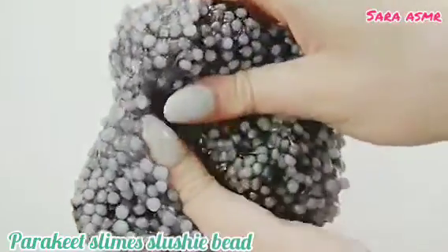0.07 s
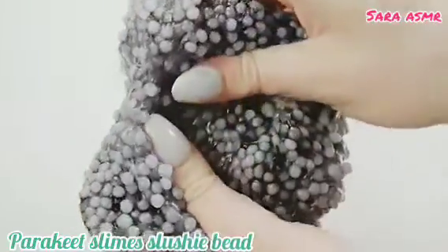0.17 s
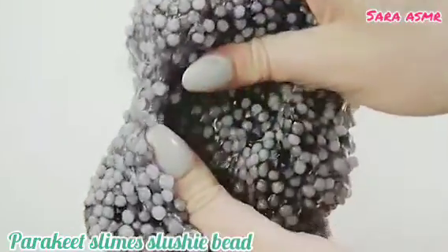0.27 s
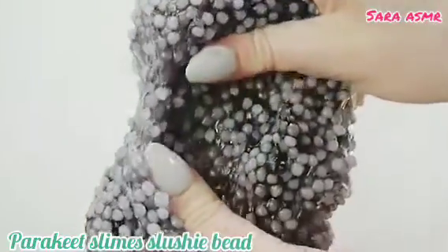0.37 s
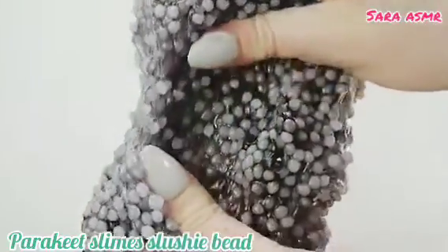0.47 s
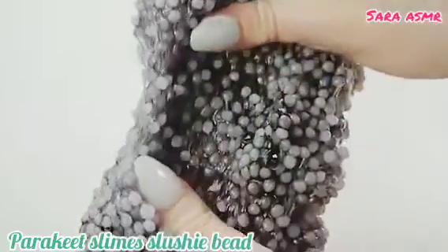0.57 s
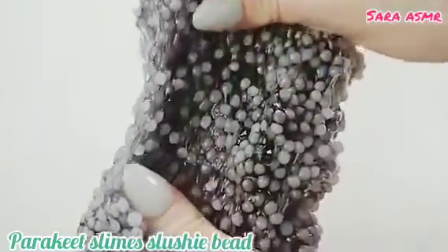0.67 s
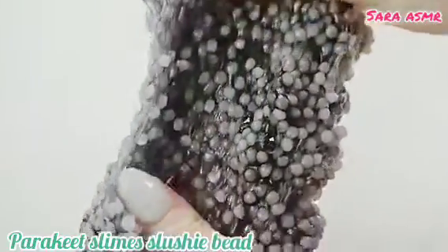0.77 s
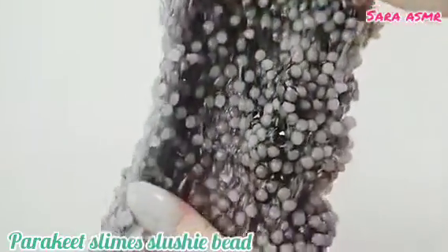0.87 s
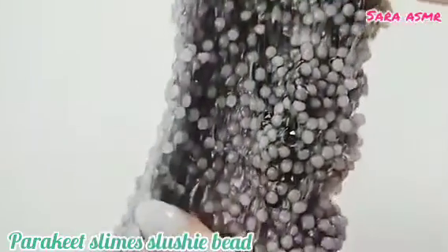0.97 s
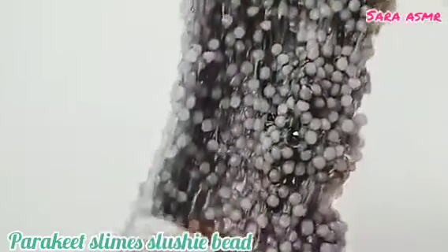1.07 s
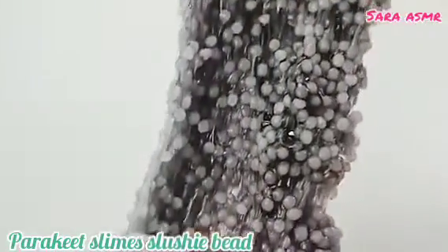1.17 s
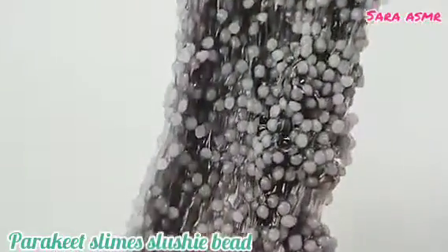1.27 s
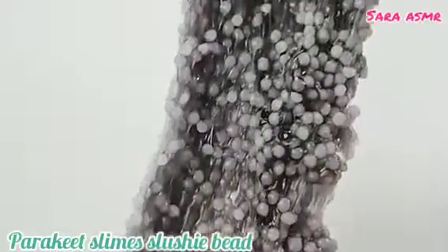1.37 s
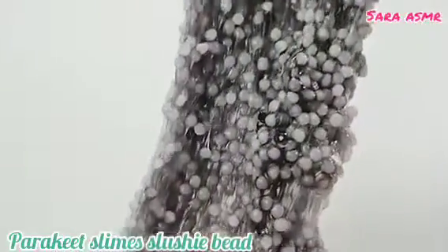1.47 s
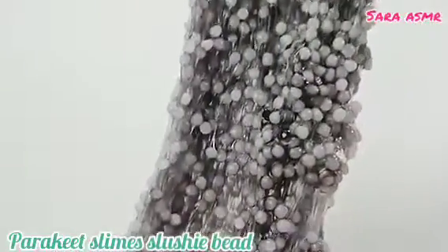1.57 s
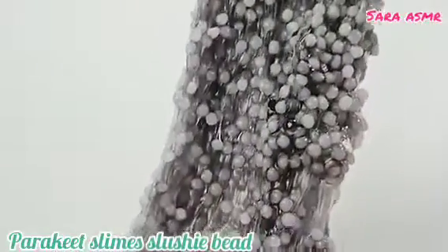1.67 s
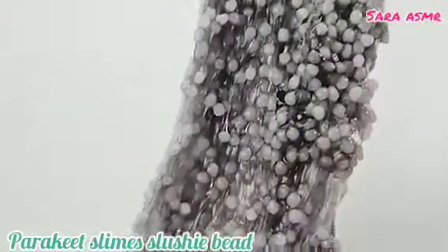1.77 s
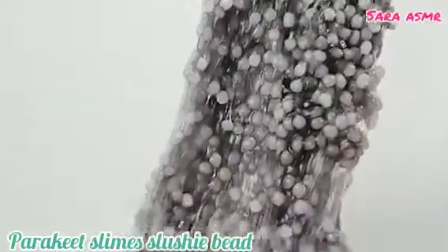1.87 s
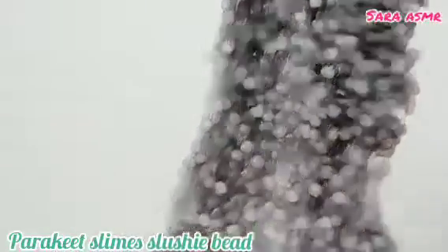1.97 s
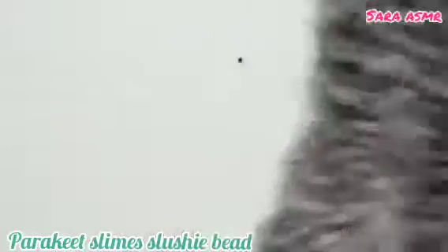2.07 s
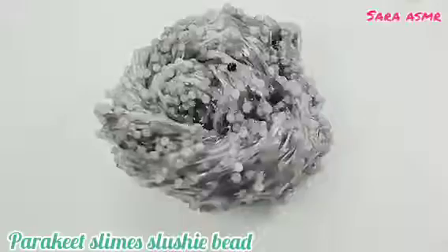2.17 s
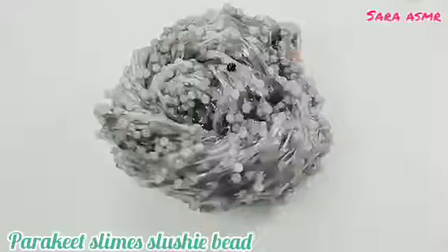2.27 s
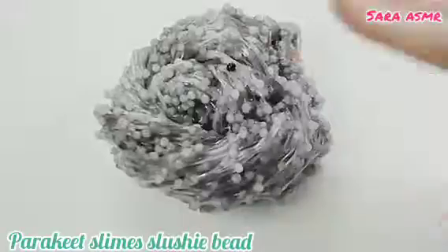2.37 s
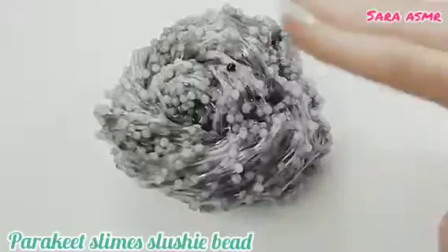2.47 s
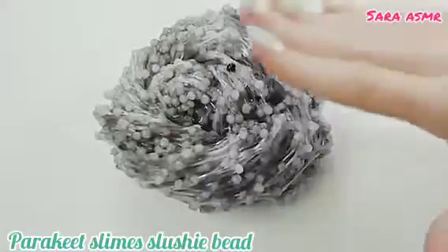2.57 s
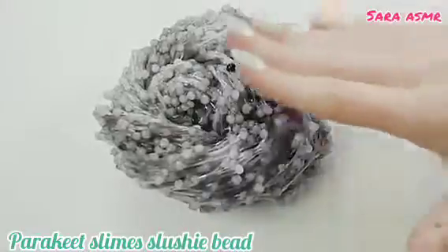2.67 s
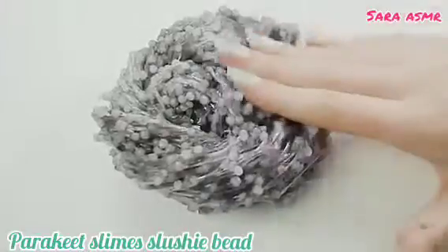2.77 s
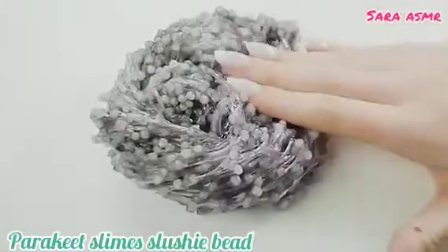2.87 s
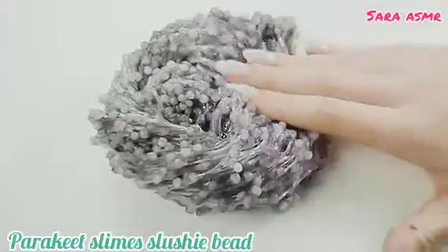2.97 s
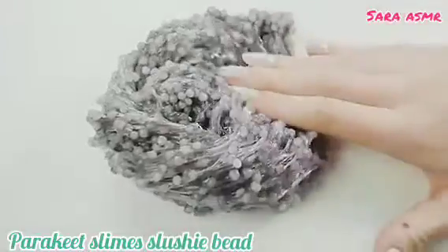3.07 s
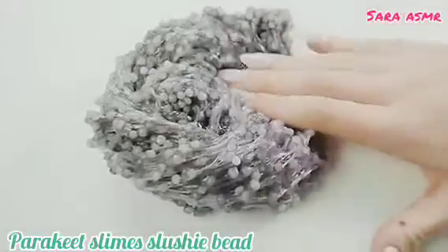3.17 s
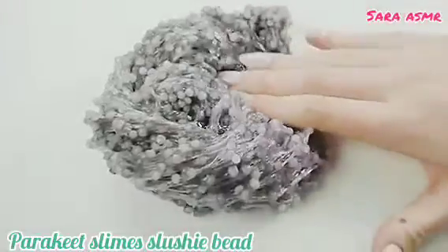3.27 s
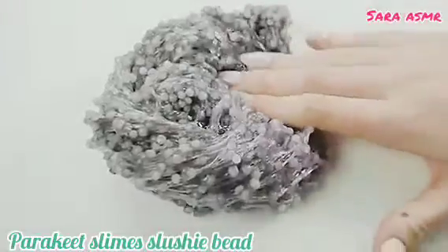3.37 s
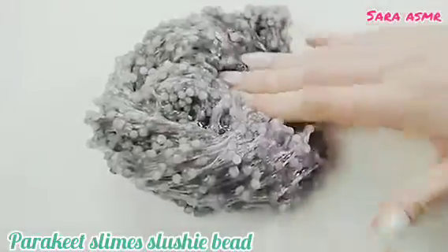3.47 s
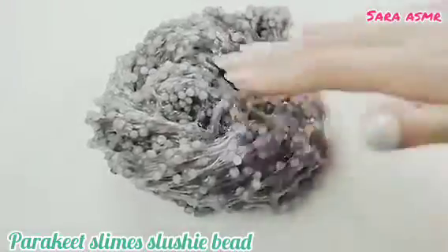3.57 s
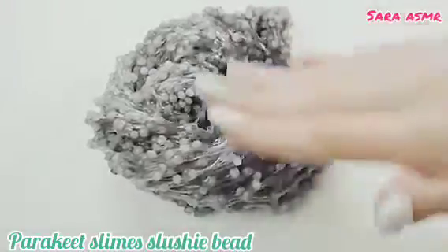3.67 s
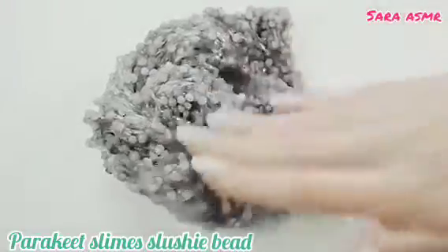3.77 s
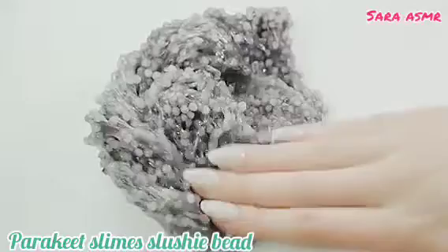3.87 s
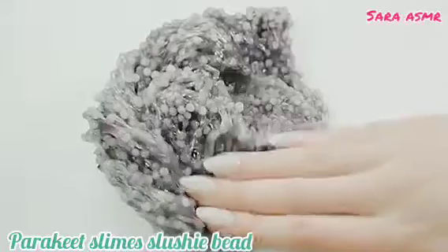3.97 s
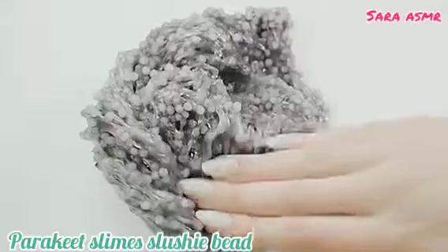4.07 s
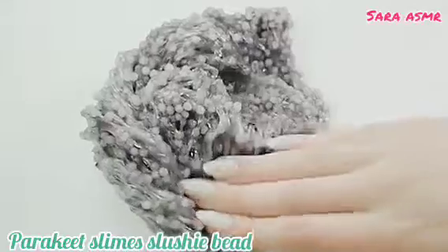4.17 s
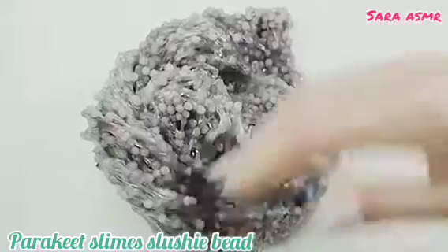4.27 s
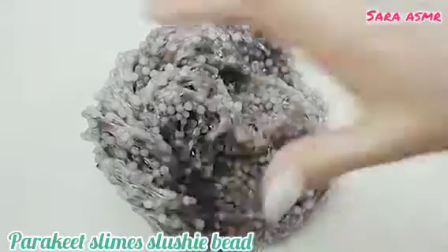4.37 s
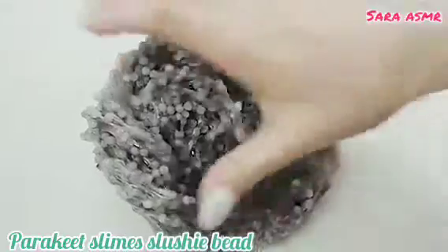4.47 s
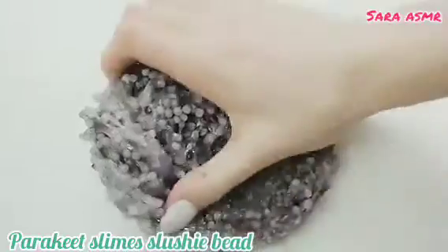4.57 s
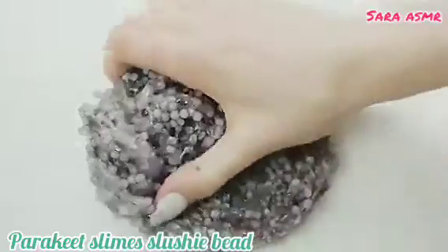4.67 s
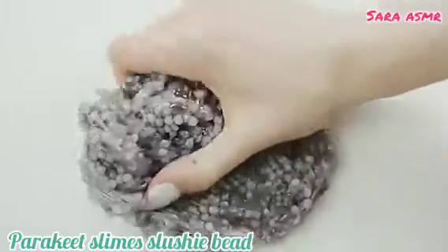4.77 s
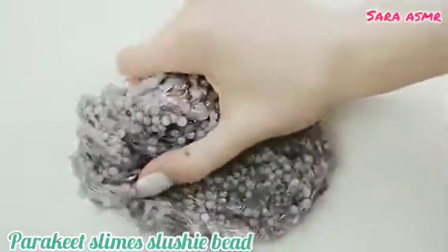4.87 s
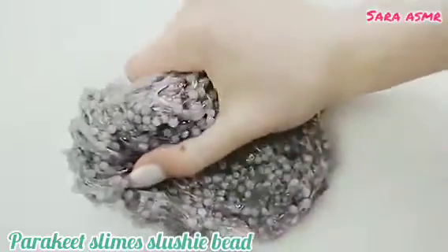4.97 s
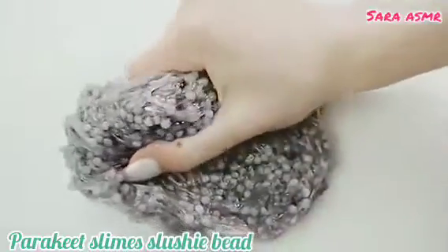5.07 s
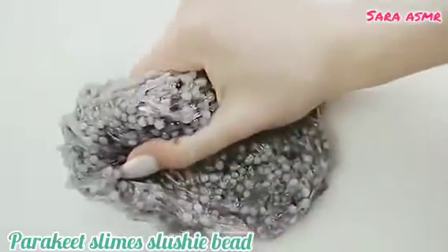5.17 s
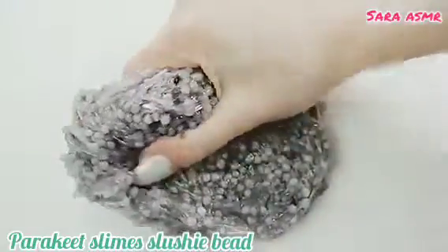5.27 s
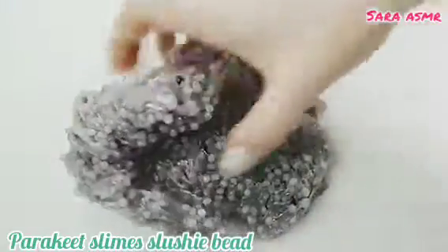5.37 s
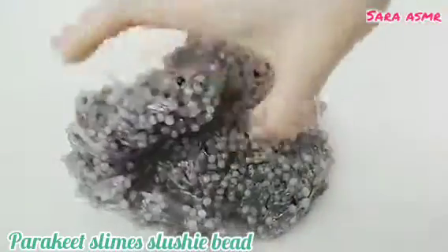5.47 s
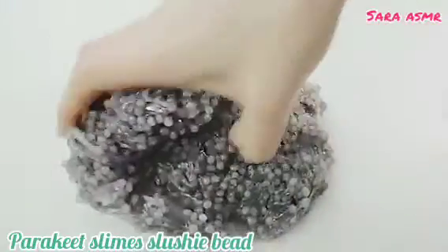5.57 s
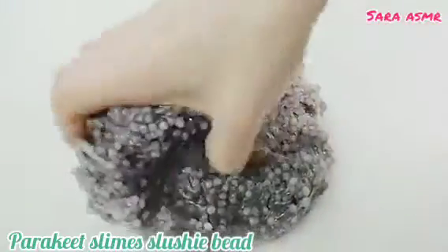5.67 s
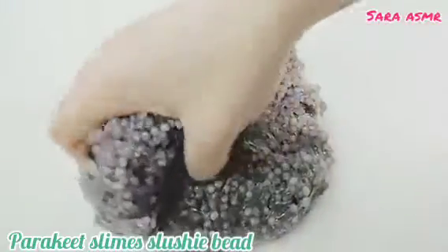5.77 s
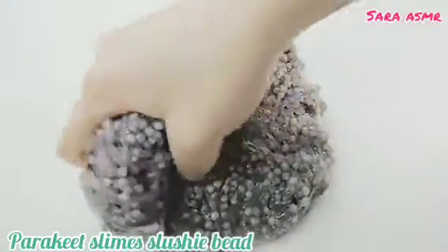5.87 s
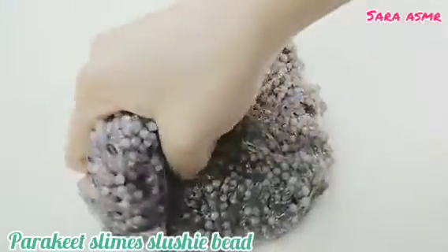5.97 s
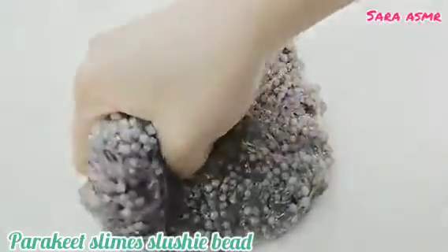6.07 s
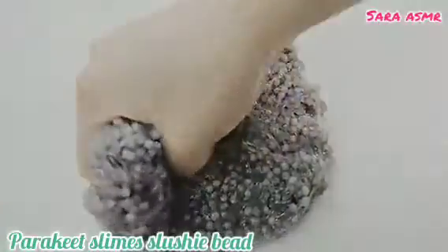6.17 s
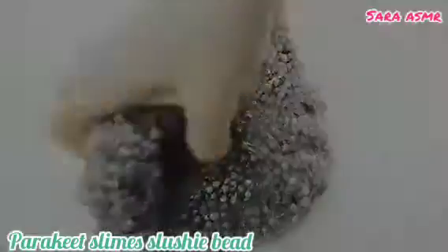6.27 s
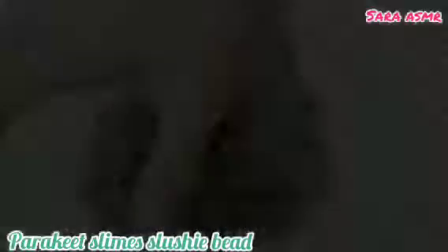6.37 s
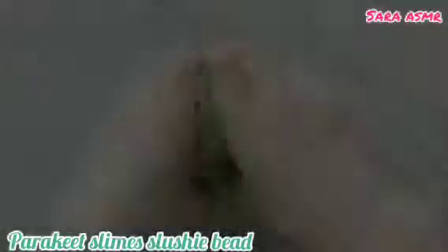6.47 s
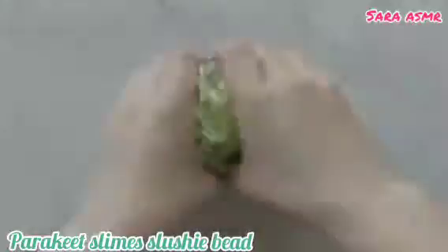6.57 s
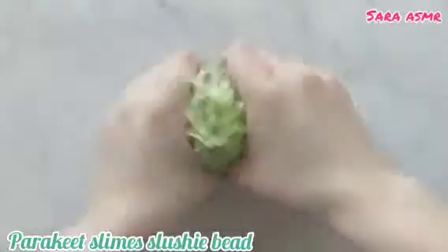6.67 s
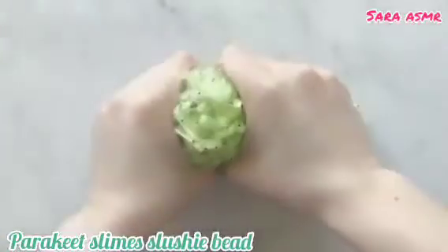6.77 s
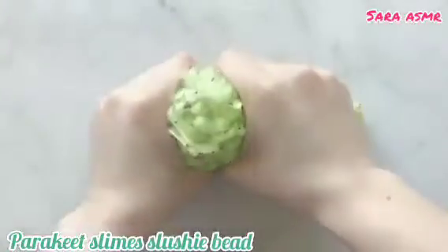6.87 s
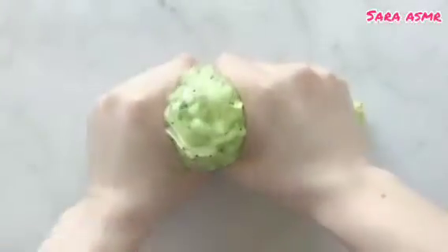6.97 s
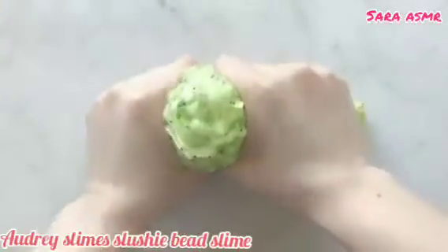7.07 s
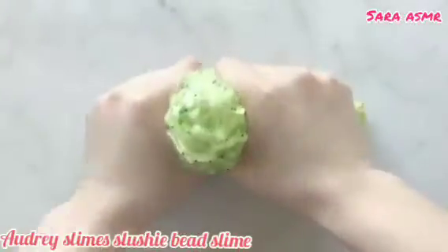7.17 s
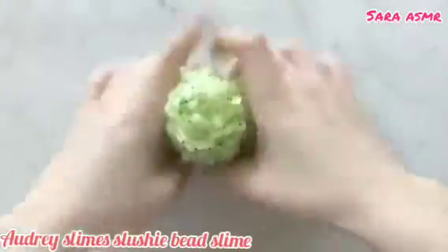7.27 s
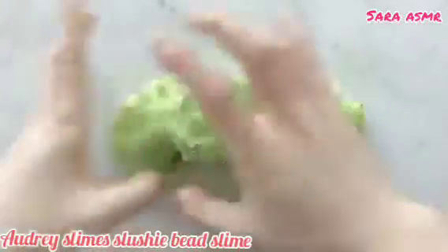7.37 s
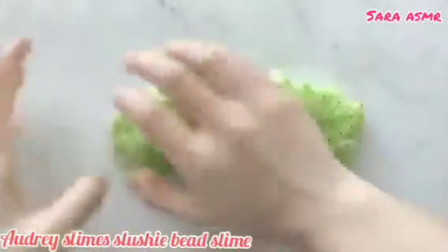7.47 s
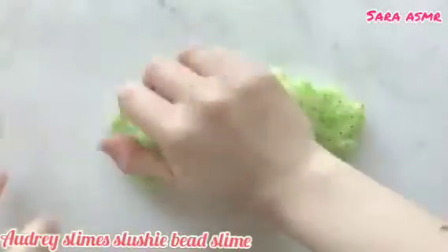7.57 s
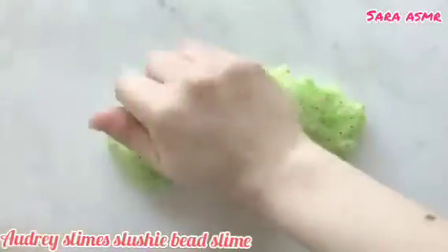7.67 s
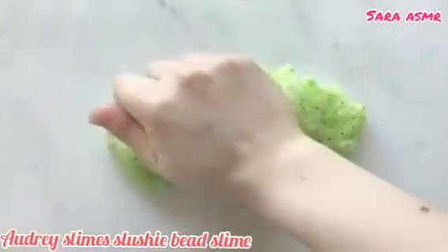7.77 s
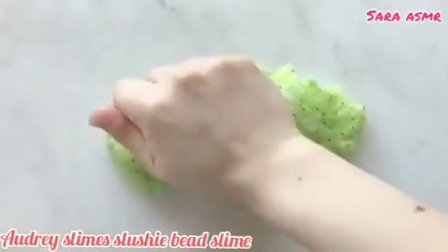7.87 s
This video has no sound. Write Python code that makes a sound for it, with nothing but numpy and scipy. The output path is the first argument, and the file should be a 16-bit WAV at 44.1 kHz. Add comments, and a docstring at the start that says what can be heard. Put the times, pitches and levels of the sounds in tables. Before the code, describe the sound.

Bead-filled slime is worked by hand on a table in a small room, heard very close. First comes one long pull with fine crackles and ticks, then repeated presses that crackle, pop and die away, and finally two loud, crisp squeezes ending in a cluster of pops. Skin brushes softly between grips. There is a faint low rumble throughout and a quiet machine hum during the last squeezes.

```python
"""Slime full of small beads, worked by hand on a table, close up. Trapped air bursts between the beads
in a dense crackle; loud pops leave a short wake of more. A few bubbles ring, with a click and a low knock.
Three passages: one batch is stretched, then pressed and folded, then a second is squeezed in both fists.
Each grip builds, holds and lets go; between grips the hand slides off with a soft swish.
Room and arms rumble underneath; a machine hums in the last passage."""
import sys
import numpy as np
from scipy import signal
from scipy.io import wavfile
from scipy.ndimage import uniform_filter1d

SR = 44100
rng = np.random.default_rng(int(sys.argv[2]) if len(sys.argv) > 2 else 0)


def transcribe(u):
    """Save the signal u as a 16-bit wav file named by the first command-line argument.

    u: samples, shape (n,) or (channels, n), limited to [-1, 1]; the rate is SR.
    q: integer samples, one column per channel.
    """
    v = np.clip(np.atleast_2d(u).T, -1, 1)
    q = np.round(v * 32767).astype(np.int16)
    wavfile.write(sys.argv[1], SR, q)


N = 349272
T = np.arange(N) / SR
BINS_HZ = np.fft.rfftfreq(1024, 1 / SR)


def amp(db):
    """dB to gain."""
    return 10 ** (np.asarray(db) / 20)


def unit_rms(x):
    """Scale to rms 1."""
    return x / np.sqrt(np.mean(x ** 2) + 1e-20)


def unit_energy(x):
    """Scale to energy 1."""
    return x / (np.linalg.norm(x) + 1e-12)


def gain_curve(rows):
    """Gain from rows (t/s, level/dB); silent before the first."""
    times_s, db = np.transpose(rows)
    return amp(np.interp(T, times_s, db, left=-200))


def strokes(rows, taper):
    """Gain of movements (start/s, end/s, level/dB), one arch of speed each."""
    gain = np.zeros(N)
    for start_s, end_s, db in rows:
        progress = np.clip((T - start_s) / (end_s - start_s), 0, 1)
        gain += amp(db) * abs(np.sin(np.pi * progress)) ** taper
    return gain


def spectrum_db(colour):
    """Rows (f/Hz, level/dB) interpolated onto BINS_HZ in log frequency."""
    hz, db = np.transpose(colour)
    return np.interp(np.log(BINS_HZ + 1), np.log(hz + 1), db)


def add(mix, at_s, sound):
    """Mix in place."""
    part = mix[max(round(at_s * SR), 0):][:len(sound)]
    part += sound[:len(part)]


def click(db):
    """Minimum-phase impulse with this spectrum on BINS_HZ."""
    log_gain = np.log(amp(np.maximum(db, db.max() - 80)))
    mirrored = np.concatenate([log_gain, log_gain[-2:0:-1]])
    return np.fft.ifft(np.exp(signal.hilbert(mirrored).conj())).real


def tinted(x, colour):
    """Filter by rows (f/Hz, level/dB)."""
    return signal.oaconvolve(x, click(spectrum_db(colour)))[:N]


def drift(per_s, size=N):
    """Random curve, rms 1, with per_s knots a second."""
    knots = rng.standard_normal(N // 16)
    return unit_rms(np.interp(T[:size] * per_s, np.arange(len(knots)), knots))


# Starts of pressing and squeezing: t/s
PASSAGE_STARTS_S = [2.4, 6.42]
PASSAGE = np.searchsorted(PASSAGE_STARTS_S, T)
STRETCHING, PRESSING, SQUEEZING = (PASSAGE == k for k in range(3))


def pocket_db(hz, width_oct):
    """Broad resonance of a bursting air pocket, weak in the bass."""
    detune = np.log2((BINS_HZ + 1) / hz) / max(width_oct, .2)
    tilt_db = -10 * np.log10(BINS_HZ / 400 + (400 / (BINS_HZ + 1)) ** 2)
    return tilt_db - 55 * np.log10(1 + detune ** 2 / 10)


def crackle(active, colour, pockets_per_s, spread_db, clump_db, width_oct, ticks_db, ticks_per_s=110):
    """Pockets burst in clumps: big, low ones singly, tiny, high ones as a fizz. Knocking beads tick."""
    centres_hz = np.geomspace(400, 13000, 14)
    bands = np.array([amp(pocket_db(hz, width_oct)) for hz in centres_hz])
    bands *= amp(spectrum_db(colour)) / np.sqrt((bands ** 2).sum(0))
    rates_per_s = pockets_per_s * centres_hz ** 0.99 / np.sum(centres_hz ** 0.99)
    size = int(active.sum())
    fizz = np.zeros(size)
    clumps_db = clump_db * drift(110, size)
    for band, per_s in zip(bands, rates_per_s):
        onsets = np.flatnonzero(rng.random(size) < per_s / SR)
        draws = rng.laplace(size=N // 8)[:len(onsets)]
        bursts = np.zeros(size)
        bursts[onsets] = np.sign(draws) * amp(spread_db * np.minimum(abs(draws), 3.5) + clumps_db[onsets])
        local_power = abs(uniform_filter1d(bursts ** 2, size=5000))
        bursts /= np.sqrt(local_power + 1e-6)  # even loudness over about 0.1 s
        bursts *= amp(3.2 * drift(45, size))  # pocket sizes prevail by turns
        fizz += signal.oaconvolve(bursts, click(20 * np.log10(band)))[:size]
    knocks = (rng.random(size) < ticks_per_s / SR) * rng.standard_normal(size)
    ticks = unit_rms(tinted(knocks, colour)[:size])
    out = np.zeros(N)
    out[active] = unit_rms(fizz) + amp(ticks_db) * ticks
    return out


# Crackle of the pull: t/s, relative level/dB
PULL_LEVEL = [(0, -39.5), (.16, -43), (.22, -50.5), (.43, -44), (.61, -49.5), (.8, -45.5), (1.02, -52),
              (1.1, -45.5), (1.53, -50.5), (1.7, -46), (1.96, -41), (2.05, -58.5), (2.19, -42)]
# Its spectrum: f/Hz, level/dB
PULL_SPECTRUM = [(150, -11.5), (300, -13), (500, -6.5), (800, -9), (1500, -6), (2600, -1), (4300, -6),
                 (7000, -3.5), (11000, -2.5), (15500, -21)]


def stretch(wake, wake_db=-38):
    """One long pull bursts pockets in a light crackle, rich in bead ticks."""
    effort = np.hypot(gain_curve(PULL_LEVEL), amp(wake_db) * wake)
    return amp(-4) * effort * crackle(STRETCHING, PULL_SPECTRUM, pockets_per_s=2800, spread_db=2.5,
                                      clump_db=3.5, width_oct=0.45, ticks_db=-0.5)


# Room rumble per passage: level/dB
ROOM_RUMBLE_DB = [-59, -61, -55]
# Arms moving over the table: start/s, end/s, level/dB
ARM_STROKES = [(-.5, .9, -55.5), (1.8, 2.06, -52), (2.4, 4.35, -62), (5.2, 5.85, -52.5)]
# Rumble spectrum: f/Hz, level/dB
RUMBLE_SPECTRUM = [(15, -40), (25, -25.5), (70, -18), (115, -11), (167, -14.5), (286, -8.5), (529, -19),
                   (588, -17), (709, -24), (927, -22), (1120, -24.5), (15000, -40)]


def rumble(push, push_db=-30, side_db=-7):
    """Uneven low noise of room, arms and the push on the table; mono in the last passage."""
    mid, side = (unit_rms(tinted(rng.standard_normal(N), RUMBLE_SPECTRUM)) for _ in range(2))
    stereo = mid + amp(side_db) * np.array([side, -side]) * ~SQUEEZING
    steady = amp(ROOM_RUMBLE_DB)[PASSAGE]
    arms = strokes(ARM_STROKES, taper=0.2)
    gain = np.sqrt(steady ** 2 + arms ** 2 + (amp(push_db) * push) ** 2)
    return stereo * gain * amp(2.3 * drift(14))


# Loudest pockets: t/s, relative energy/dB, f/Hz, width/oct, flurry share of energy/0-1
LOUD_POCKETS = [(0.035, -15, 3300, 0.32, .1), (0.0936, -5, 5400, 0.4, 0.56), (0.146, -6, 4400, 0.54, 0),
                (0.2434, -15, 5100, .6, .6), (0.3112, -0.5, 9700, 0.74, 0), (0.383, -5.5, 8800, .75, 0.84),
                (0.4305, 3, 9600, 0.71, 0.99), (0.5083, -11.5, 9700, .16, 0), (0.636, -17, 5600, 1.7, 0.8),
                (0.6845, -5, 9700, .16, 0.4), (0.7538, -9.5, 3400, 1.3, 0.33),
                (0.8795, -14.5, 2480, 0.5, 0), (0.9185, -17.5, 6000, 1.4, 0.16),
                (1.1242, -14, 7900, 0.7, 0.5), (1.1915, -5.5, 5540, 0.88, 0.76),
                (1.2599, -7, 6700, 0.93, 0.3), (1.338, -15, 4000, 0.73, .7), (1.402, -12, 4100, 0.56, 0),
                (1.413, -10.5, 9000, 0.86, 0.7), (1.5824, -7, 8700, 0.92, 0.9),
                (1.6275, -7.5, 8900, 0.6, 0.04), (1.6676, -2.5, 4800, 0.63, 0.4),
                (1.6753, -4.5, 7000, 0.63, 0.94), (1.964, -8.5, 4800, 1.2, 0.73),
                (2.7908, -6, 2400, 2.2, 0.46), (2.9373, -4, 2400, .56, 0), (2.9852, -5.5, 7200, 0.41, 0.7),
                (2.994, -5, 2200, 0.51, 0.4), (3.065, -8.5, 2600, 0.61, .45), (3.128, -8, 1800, 0.26, 0.5),
                (3.1675, -5, 4700, 0.89, 0), (3.2272, -12, 2220, 0.57, 0.4), (3.2769, -3, 2600, 1.17, 0.04),
                (3.3454, -11.5, 1625, 0.31, 0.14), (3.3799, -3.5, 6000, 0.9, 0),
                (3.8863, -1.5, 1500, 1.1, 0), (4.006, -4, 2400, 0.64, .4), (4.046, -4.5, 5100, 0.75, 0.7),
                (4.134, -9, 3000, 0.51, 0), (4.1854, -3.5, 2700, 0.72, 0.23), (4.6142, -5.5, 7500, 0.46, 1),
                (4.6682, 0, 3100, 0.51, 0.4), (4.7175, 3.5, 3700, .8, 0.2), (4.8787, 2.5, 2900, 1.15, 0.74),
                (4.942, 7.5, 4850, 1.2, 0.13), (4.957, 4, 5330, 0.35, 1), (4.9928, 5.5, 4000, 2.7, 0.88),
                (5.1766, 0.5, 3900, 0.92, .6), (5.2639, -14.5, 4960, 0.88, 0.3),
                (5.659, -3, 3400, 0.53, 0.24), (5.7158, 0, 2200, 0.41, 0.1), (5.7731, 4, 2500, 1.03, 0.54),
                (5.7882, -0.5, 8500, 0.68, 0.7), (5.8355, 1, 3500, 2.1, 0.25), (5.954, 2, 2900, 0.85, 0.6),
                (6.026, 8, 3700, 0.87, 0.5), (6.203, -9, 2320, 0.42, 0.4), (6.5395, -6, 2800, 0.75, 0.3),
                (6.6396, 2.5, 2300, 0.61, 0.4), (6.7548, 4.5, 4400, 1.5, .86),
                (6.7641, 10.5, 7000, 0.45, 0), (6.7984, 5, 7100, 0.28, 0.5), (6.8257, 4, 2800, 8.6, .1),
                (6.8592, 13, 6200, 0.56, .98), (6.894, 11, 8500, 0.7, 0.93), (6.95, 8, 6300, 0.88, 0.5),
                (7.052, 7.5, 11300, 0.32, 1), (7.077, -1, 4800, 0.36, .64), (7.109, -2.5, 7400, 0.93, .7),
                (7.5762, -9, 3600, 1.5, 0.03), (7.6838, 5.5, 7100, 0.41, 0.02),
                (7.7029, 8.5, 2700, 2.1, 0.98), (7.7286, 9.5, 1400, 1.05, 0.46),
                (7.7465, 12.5, 8500, 0.32, 0.9), (7.7826, 13.5, 5440, 0.79, 0.5),
                (7.8173, 13, 1800, 4.7, 0.86), (7.8922, 11, 4600, 1.6, 1)]


def pops(rise_s=0.0017, settle_s=0.0018, snap_s=0.00058, gain_db=-2.25):
    """Air pockets burst: each pop swells briefly, snaps and trails a flurry of clicks."""
    out, lead = np.zeros(N), SR // 200
    t = np.arange(-lead, 3 * lead) / SR
    flurry_env = np.exp(np.minimum(t / rise_s, -t / settle_s))
    snap_env = (t >= 0) * np.exp(-abs(t) / snap_s)
    for at_s, db, hz, width_oct, share in LOUD_POCKETS:
        pocket = click(pocket_db(hz, width_oct))
        snap = unit_energy(np.convolve(snap_env * rng.standard_normal(len(t)), pocket))
        flurry = unit_energy(np.convolve(flurry_env * rng.standard_normal(len(t)), pocket))
        pop = unit_energy(np.sqrt(1 - share) * snap + np.sqrt(share) * flurry)
        add(out, at_s + t[0], amp(db + gain_db) * pop)
    return out


def wakes(decay_db_per_s=262.5):
    """Crackle gain as beads resettle after each pop, in proportion to its size."""
    power = np.zeros(N)
    for at_s, db, *_ in LOUD_POCKETS:
        add(power, at_s, amp(db - decay_db_per_s * T[:SR // 4]) ** 2)
    return np.sqrt(power)


# Short pitched sounds: t/s, level/dB, f/Hz, fade/s
PITCHED_BLIPS = [(0.4314, -23.5, 1630, 0.0015), (2.677, -38, 2470, 0.00034), (2.79, -15, 2550, 0.00053),
                 (6.024, -25, 420, 0.0019), (7.702, -29, 380, 0.0025), (7.728, -20, 605, 0.004),
                 (7.746, -23.5, 460, 0.0062), (7.783, -20, 430, 0.0026), (7.8173, -8, 484, 0.0026),
                 (7.8257, -3.5, 7300, 0.0035), (7.891, -21, 560, 0.001)]


def blips():
    """Short pitched sounds: ringing bubbles, a small click and a low knock."""
    out, t = np.zeros(N), T[:SR // 30]
    for at_s, db, hz, fade_s in PITCHED_BLIPS:
        envelope = 2 * t / fade_s * np.exp(-(t / fade_s) ** 2)
        add(out, at_s, amp(db) * envelope * np.sin(2 * np.pi * hz * t))
    return out


# Grips: start/s, release/s, relative level/dB, build-up/s, relaxation/(dB/s)
HAND_GRIPS = [(2.824, 3.285, -44, 0.078, 96), (3.747, 4.157, -40, 0.079, 223),
              (4.606, 4.942, -29.5, 0.029, 98), (5.042, 5.17, -32, .08, 275),
              (5.649, 5.78, -32.5, 0.0089, 188), (5.817, 6.002, -31.5, 0.022, 76),
              (6.487, 7.027, -27, 0.16, 127), (7.59, 7.816, -25.5, 0.15, 99)]


def grips(touch_db=-18):
    """Gain of hand pressure: builds from a light touch, holds, relaxes."""
    power, t = np.zeros(N), T[:SR]
    for start_s, release_s, db, build_s, relax_db_per_s in HAND_GRIPS:
        build_db = touch_db * np.maximum(1 - t / build_s, 0)
        relax_db = relax_db_per_s * np.maximum(start_s + t - release_s, 0)
        add(power, start_s, amp(db + build_db - relax_db) ** 2)
    return np.sqrt(power)


# Crackle under pressing: f/Hz, level/dB
PRESS_SPECTRUM = [(70, -17), (200, -9.5), (400, 1.5), (800, -5.5), (1200, 3), (1900, -0.5), (2700, 3.5),
                  (3600, -0.5), (10400, -3), (14000, -12.5), (15500, -28)]


def press(push, wake, wake_db=-40):
    """Pressing and folding force air out in a dense crackle."""
    effort = np.hypot(push, amp(wake_db) * wake)
    return amp(0.5) * effort * crackle(PRESSING, PRESS_SPECTRUM, pockets_per_s=10000, spread_db=5.0,
                                       clump_db=2.0, width_oct=0.36, ticks_db=-7.5)


# Hand sliding to a new grip: start/s, end/s, relative level/dB
HAND_SLIDES = [(3.495, 3.627, -36.5), (4.23, 4.38, -38), (5.291, 5.526, -34.5), (6.248, 6.405, -38.5),
               (7.184, 7.391, -30.5)]
# Swish spectrum: f/Hz, level/dB
SLIDE_SPECTRUM = [(47, -33), (80, -4), (569, 3), (864, -2), (1200, 1.5), (8550, -4.5), (13600, -7.5),
                  (15500, -27)]


def slides(gain_db=-1.5, grain_db=3.0):
    """Skin brushes along: a grainy swish that follows hand speed."""
    friction = rng.standard_normal(N) * amp(grain_db * drift(300))
    swish = unit_rms(tinted(friction, SLIDE_SPECTRUM))
    return amp(gain_db) * swish * strokes(HAND_SLIDES, taper=1.71)


# Machine hum: t/s, level/dB
HUM_LEVEL = [(6.45, -70), (6.65, -56.5), (7.1, -50.5), (7.9, -46.5)]


def machine_hum(hz=69.6, waver_rad=0.85, waver_db=1.5):
    """A low tone, wavering in phase and level."""
    tone = np.sqrt(2) * np.sin(2 * np.pi * hz * T + waver_rad * drift(30))
    return tone * gain_curve(HUM_LEVEL) * amp(waver_db * drift(36))


# Crackle of the second batch: f/Hz, level/dB
SQUEEZE_SPECTRUM = [(71, -33), (120, -31), (282, -0.5), (863, -7.5), (1190, -0.5), (2160, -4), (5170, -5),
                    (13200, -6.5), (15500, -5.5)]


def squeeze(push, wake, wake_db=-44):
    """Both fists force air out of the second batch in a bright crackle."""
    effort = np.hypot(push, amp(wake_db) * wake)
    return amp(-2) * effort * crackle(SQUEEZING, SQUEEZE_SPECTRUM, pockets_per_s=7000, spread_db=4.5,
                                      clump_db=3.5, width_oct=0.39, ticks_db=-4.5)


def echoes(t60_s, delay_s=0):
    """Decay envelope of dense reflections, energy 1."""
    t = T[:SR // 5]
    return unit_energy((t > delay_s) * amp(-60 * t / t60_s))


def scattered(x, envelope, block=1024):
    """Dense reflections, redrawn every block so the room adds no fixed ringing tone."""
    out = np.zeros(N)
    for i in range(0, N, block):
        piece = x[i:i + block]
        if abs(piece).max() > 1e-9:
            reflections = envelope * rng.standard_normal(len(envelope))
            add(out, i / SR, signal.fftconvolve(piece, reflections))
    return out


# Stereo width, stretching and pressing: f/Hz, relative side level/dB
WIDE_SIDE = [(300, -4.5), (2500, -12.5), (6000, -15.5), (11000, -8)]
# Stereo width, squeezing: f/Hz, relative side level/dB
NARROW_SIDE = [(2800, -69), (4200, -10.5), (11000, -3.5)]


def room(x, width, side_db, near_db, far_db, near_t60_s=0.04, far_t60_s=0.15):
    """Hands and table scatter at once, the small room answers later; left and right differ slightly."""
    near = amp(near_db) * echoes(near_t60_s, delay_s=0.0005)
    far = amp(far_db) * echoes(far_t60_s, delay_s=0.0065)
    mid = x + scattered(x, np.hypot(near, far))
    side_env = unit_energy(np.hypot(echoes(0.009), echoes(far_t60_s / 2)))
    side = amp(side_db) * tinted(scattered(x, side_env), width)
    return np.array([mid + side, mid - side])


def scene():
    """Three passages, each with its own crackle and distance, plus blips, rumble and hum."""
    pops_and_slides = pops() + slides()
    push, wake = grips(), wakes()
    stretched = stretch(wake) + pops_and_slides * STRETCHING
    pressed = press(push, wake) + pops_and_slides * PRESSING
    squeezed = squeeze(push, wake) + pops_and_slides * SQUEEZING
    slime = (room(stretched, WIDE_SIDE, side_db=5.5, near_db=-3.0, far_db=-6.5)
             + room(pressed, WIDE_SIDE, side_db=2.0, near_db=-5.0, far_db=-8.0)
             + room(squeezed, NARROW_SIDE, side_db=-4.5, near_db=-6.5, far_db=-13.0))
    return slime + blips() + rumble(push) + machine_hum()


# Fades between passages: t/s, linear gain
FADES = [(2.21, 1), (2.235, 0), (2.485, 0), (2.505, 1), (6.03, 1), (6.22, .4), (6.37, .25), (6.42, 0),
         (6.64, 1)]


def record(dry, ceiling=0.88, cutoff_hz=15380):
    """Fades, hard limit, low-pass."""
    fader = np.interp(T, *np.transpose(FADES))
    limited = np.clip(dry * fader, -ceiling, ceiling)
    lowpass = signal.firwin(401, cutoff_hz, window=("kaiser", 9), fs=SR)
    return signal.oaconvolve(limited, lowpass[None], "same")


dry = scene()
out = record(dry)
transcribe(out)
```